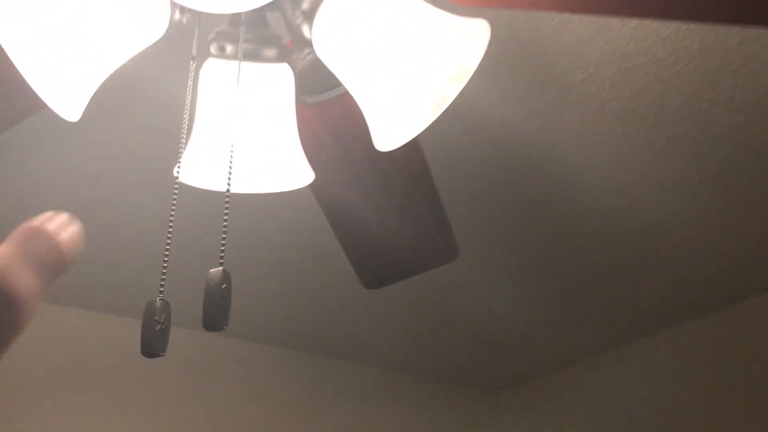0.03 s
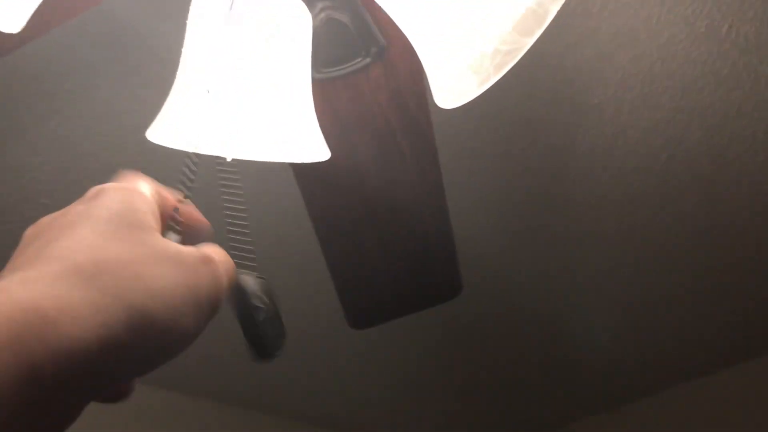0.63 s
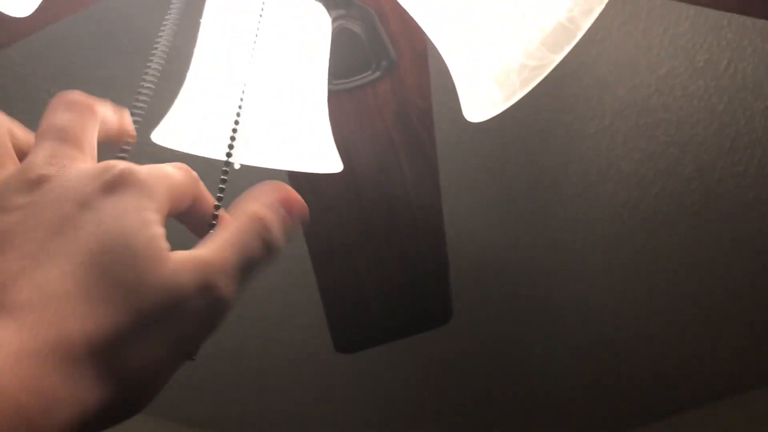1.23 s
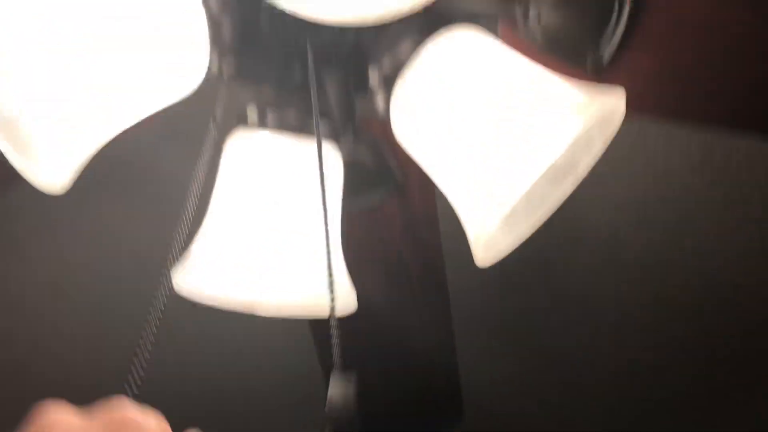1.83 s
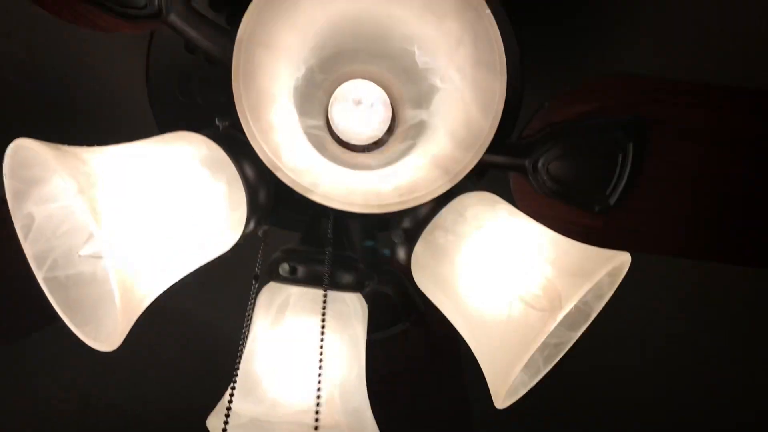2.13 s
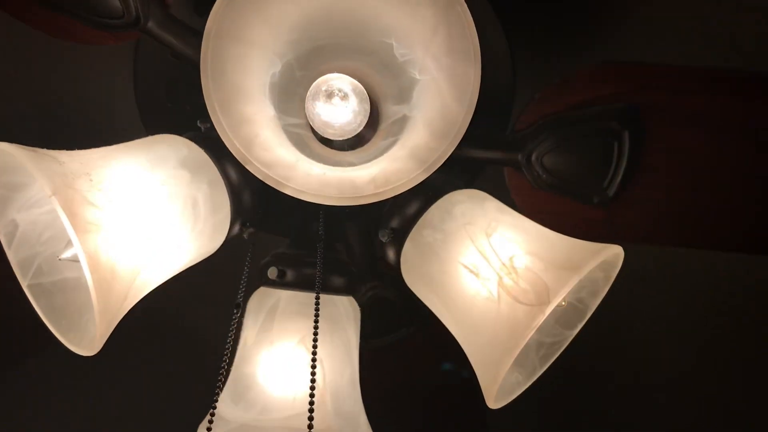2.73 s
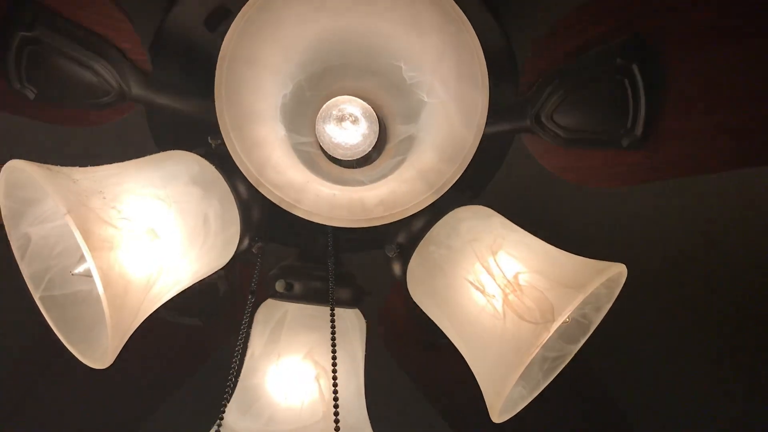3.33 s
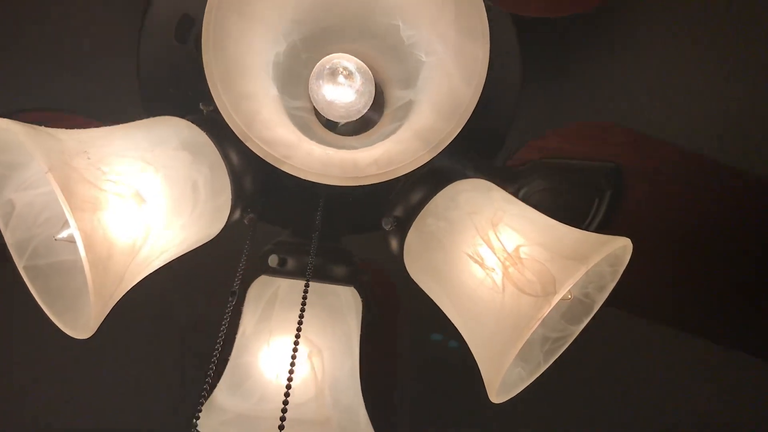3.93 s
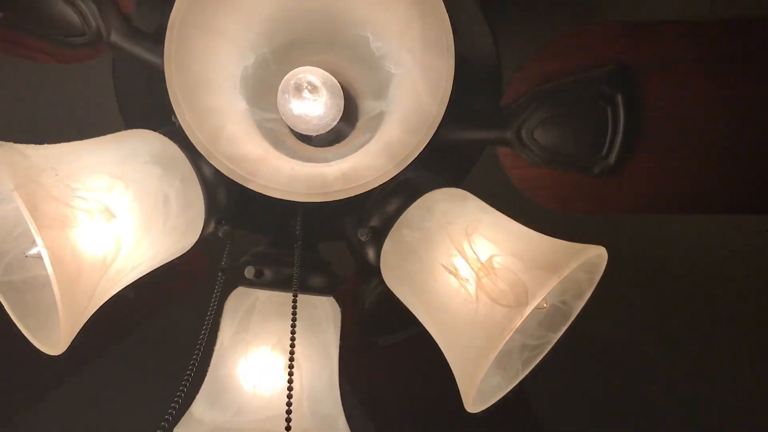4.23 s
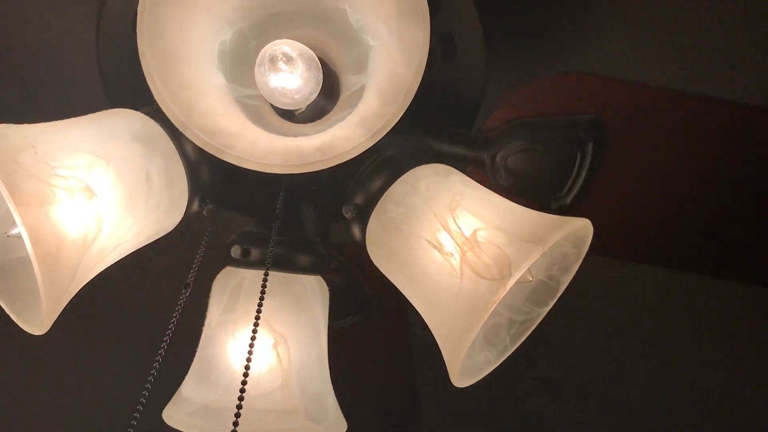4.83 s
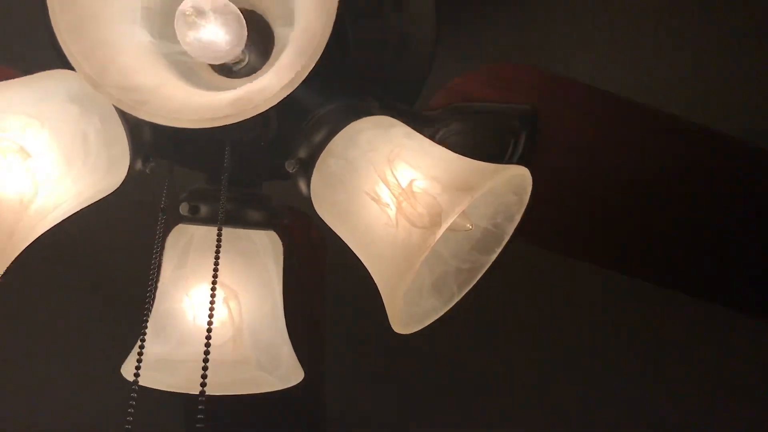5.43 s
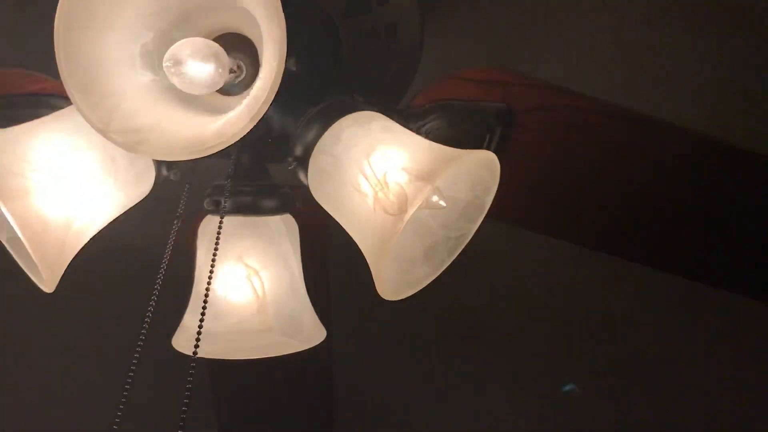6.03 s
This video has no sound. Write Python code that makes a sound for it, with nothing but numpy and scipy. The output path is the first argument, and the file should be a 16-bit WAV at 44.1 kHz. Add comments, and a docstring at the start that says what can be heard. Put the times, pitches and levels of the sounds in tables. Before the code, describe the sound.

In a small quiet room, the pendants of a ceiling fan's chains clack together and one chinks lightly on a glass shade. The chain is then pulled and released three times. Each time the beads scrape and tick, the switch snaps sharply with a dull shudder from the fan, and it clicks again on release. The microphone is close, with a very faint motor hum underneath.

```python
"""Ceiling fan pull chains

A small quiet room, one microphone close to the fan. Over a thin, fading hiss the chains' pendants knock
together and one chinks on a glass shade. The speed switch is pulled and let go three times: beads scrape
through the eyelet, the ratchet ticks and snaps, the housing rings and the tugged fan shudders on its
mount. From the first pull on, the motor hums faintly in the room tone."""
import sys
import numpy as np
from scipy import signal
from scipy.fft import rfft, irfft, next_fast_len
from scipy.io import wavfile
from scipy.ndimage import uniform_filter1d

SR = 44100
rng = np.random.default_rng(int(sys.argv[2]) if len(sys.argv) > 2 else 0)


def waveform_to_disk(signal):
    """Save audio, clipped to [-1, 1], as 16-bit WAV at the path in sys.argv[1]."""
    frames = np.transpose(np.atleast_2d(signal))
    scaled = np.clip(frames, -1, 1) * 32767
    samples = np.round(scaled).astype(np.int16)
    wavfile.write(sys.argv[1], SR, samples)


N = 267819
TIME = np.arange(N) / SR
RING_TIME = TIME[:int(SR * .7)]

# room tone spectrum: (frequency [Hz], gain [dB])
AIR_COLOUR = [(12, -42), (20, -15.5), (48, 3), (142, 1), (241, -5.5), (270, -2), (485, -9.5), (527, -8.5),
              (574, -9), (1480, -15), (1660, -17), (3340, -18.5), (10500, -26), (12800, -21),
              (16000, -29.5)]
# handling bump spectrum: (frequency [Hz], gain [dB])
BUMP_COLOUR = [(20, -16), (52, 4.5), (80, 0), (140, -11.5), (250, -29), (600, -67)]
# soft finger taps: (time [s], level [dB], band frequency [Hz])
FINGER_TAPS = [(.852, -57.5, 2570), (5.956, -49, 1000)]
# pendants knocking together: (time [s], relative level [dB])
KNOCKS = [(0.5479, 3), (.5573, -30.5), (0.5647, -4.5)]
# spectrum of a knock: (frequency [Hz], gain [dB])
KNOCK_COLOUR = [(240, -58), (400, -34.5), (777, -31), (1310, -24.5), (2320, -16.5), (4180, -5),
                (4800, -11.5), (5600, -0.5), (9470, -5), (13500, -47.5), (16000, -34)]
# beads jolted by the knocks: (time [s], level [dB])
BEAD_JOLTS = [(0.5471, -33), (0.5562, -33.5), (0.5607, -36.5)]
# pendant touching the shade: (time [s], ring level [dB], relative contact level [dB])
CHINKS = [(0.6657, -58, 17.5), (.734, -59.5, -7)]
# glass shade modes: (frequency [Hz], level [dB], t60 [s])
SHADE_MODES = [(3491, 0, 0.16), (5875, -0.5, 0.12), (7870, -15, 0.13), (9700, -17, 0.21), (11620, -9, 0.11),
               (12300, -10, 0.16), (13950, -13, 0.14)]
# spectrum of a bead or pendant contact: (frequency [Hz], gain [dB])
CONTACT_COLOUR = [(1000, -26.5), (4500, -5.5), (6500, 4), (8200, 6.5), (10300, -7), (12000, 4.5),
                  (14000, -6), (16000, -32)]
# edges of the body, bite, edge and top bands: (frequency [Hz])
BAND_EDGES = [250, 2800, 6200, 10500, 17000]
# the room's reverberation, a row per band: (gain [dB], t60 [s])
ROOM_DECAY = [(-2.5, 0.29), (-6.5, 0.25), (-10.5, 0.22), (-7, 0.16)]
# pawl and bead ticks: (time [s], level [dB], tilt [dB per band])
TICKS = [(2.231, -73.5, -10), (2.27, -66, -10), (2.291, -55, -1), (2.358, -58, -4), (2.372, -55, 2),
         (2.4698, -48, 0), (2.906, -52.5, 3), (2.944, -47, 2), (3.007, -53, 1), (3.49, -73, -13.5),
         (3.526, -50.5, 2.8), (3.584, -57.5, -2.5), (4.036, -49, 2), (4.0685, -46, 1.5),
         (4.523, -69.5, -8.5), (4.558, -50.5, 1), (4.623, -56, 3.5), (4.695, -51.5, -4),
         (4.977, -47.5, 1.5), (5.004, -44.5, 2), (5.023, -58, 7), (5.041, -56, 4), (5.142, -69.6, -6)]
# colour of all ticks, a value per band: (gain [dB])
TICK_COLOUR = [-2.5, 4, -0.5, -0.9]
# ratchet snaps, pull and release in turn:
# (time [s], body [dB], bite [dB], edge [dB], top [dB], base t60 [s], spring gain [dB], thud [dB])
SNAPS = [(2.5509, -37, -39, -36, -36.5, 0.0098, 2, -34.5),
         (2.9713, -36.5, -33.5, -31.5, -39, 0.017, 2.5, -44),
         (3.668, -39, -37, -40.5, -31.5, 0.047, -35, -32.5),
         (4.089, -32.5, -30, -30.5, -33.5, 0.0099, 6.5, -51),
         (4.7, -37.5, -36.5, -31.5, -33.5, 0.018, -14, -32),
         (5.0112, -39.5, -33.5, -26.5, -35, 0.016, 11.5, -59.5)]
# spectrum of the switch's crack: (frequency [Hz], gain [dB])
CRACK_COLOUR = [(200, -12.5), (450, -10), (640, -5), (850, -0.5), (2300, 0.5), (2750, -6.5), (3400, -3.5),
                (4600, -6), (6300, -0.5), (9600, 2), (10600, 1), (14000, 7.5), (16000, -7.5)]
# switch housing modes: (frequency [Hz], width [Hz], gain [dB])
HOUSING_MODES = [(535, 16, 11.5), (864, 19, -33), (1070, 32.6, 2.5), (1406, 110, 4), (1860, 230, 8.5),
                 (2400, 73, 2.5), (3480, 380, -2.5), (4255, 180, 4.5), (5300, 170, 9.5), (6540, 155, 5.5),
                 (7110, 150, 1), (8390, 480, 8.5), (12200, 160, -16), (15000, 460, -2.5)]
# return spring and seat, struck hardest on release: (frequency [Hz], width [Hz], gain [dB])
SPRING_MODES = [(890, 100, -7.5), (1960, 180, -10.5), (2380, 57, 6), (3670, 550, -1), (5220, 83, -2),
                (7220, 110, 7), (9240, 200, -9.5)]
# lamp holder modes: (frequency [Hz], level [dB], t60 [s])
LAMP_MODES = [(1050, -20.5, 0.42), (1458, -21, 0.19), (1601, -22, 0.61), (1645, -24.5, 0.83),
              (1750, -34, 0.33), (4170, -26, 0.55)]
# chain sliding through the eyelet: (start [s], length [s], relative level [dB])
SLIDES = [(2.26, 0.035, -55.5), (2.351, 0.025, -47.5), (2.364, 0.097, -65), (2.456, 0.021, -42.5),
          (2.832, 0.078, -67), (2.895, 0.031, -53.5), (3.503, 0.025, -51.5), (3.56, 0.038, -51),
          (3.658, 0.0105, -41), (4.02, 0.07, -55), (4.505, 0.15, -57), (4.684, 0.037, -45),
          (4.919, 0.18, -60)]
# load on the fan, a row per snap: (build-up [s], relative strain [dB], relative jolt [dB])
TUGS = [(0.29, -44, -47), (0.11, -59, -55.5), (0.2, -51, -41), (0.066, -53, -57.5), (0.19, -51.5, -42.5),
        (0.058, -63, -58)]
# ceiling mount modes: (frequency [Hz], width [Hz], gain [dB])
MOUNT_MODES = [(55.6, 9.1, -8), (77, 8.2, 4)]
# blade modes: (frequency [Hz], width [Hz], gain [dB])
BLADE_MODES = [(129.3, 6.5, 3), (135, 10.5, -3), (173, 46, -12.5), (192.4, 6.8, -5.5)]
# mains harmonics in the hum, a row per speed: (second [dB], fourth [dB], sixth [dB])
SPEED_HUMS = [(-70, -82.5, -77), (-71.5, -74, -81.5), (-81, -78.5, -92.5)]


def undb(db):
    """Decibels to gain."""
    return 10 ** (np.asarray(db) / 20)


def unit(x):
    """Scale to an rms of one."""
    return x / np.sqrt(np.mean(x ** 2))


def noise():
    """White noise as long as the scene."""
    return rng.standard_normal(N)


def add(track, s, x):
    """Mix x into the track at s seconds."""
    i = int(s * SR)
    track[i:i + len(x)] += x[:N - i]


def fade(t60, t=RING_TIME):
    """Full level until t is zero, then a decay of 60 dB per t60."""
    return np.exp(-np.log(1000) * np.maximum(t, 0) / t60)


def swell(s, rise, hold, t60):
    """Envelope that starts at s seconds, rises, holds and decays."""
    t = TIME - s
    return np.clip(t / max(rise, 1e-3), 0, 1) * fade(t60, t - rise - hold)


def band(x, lo_hz, hi_hz):
    """Band-pass filter."""
    return signal.sosfilt(signal.butter(4, [lo_hz, hi_hz], "band", fs=SR, output="sos"), x)


def tint(x, points):
    """Causal filter whose gain follows (frequency [Hz], gain [dB]) points."""
    size = 2 * next_fast_len(len(x))
    hz, db = np.transpose(points)
    freq = np.maximum(np.fft.rfftfreq(size, 1 / SR), 1)
    gain = undb(np.interp(np.log(freq), np.log(hz), db))
    cepstrum = irfft(np.log(gain))
    cepstrum[1:size // 2] *= 2  # fold to minimum phase
    cepstrum[size // 2 + 1:] = 0
    return irfft(rfft(x, size) * np.exp(rfft(cepstrum)))[:len(x)]


def resonate(x, modes):
    """Pass x through (frequency [Hz], width [Hz], gain [dB]) resonances."""
    size = next_fast_len(len(x))
    freq = np.fft.rfftfreq(size, 1 / SR)
    response = sum(undb(db) / (1 + 2j * (freq - hz) / width) for hz, width, db in modes)
    return irfft(rfft(x, size) * response, size)[:len(x)]


def room_tone(level_db=-67):
    """The still air of the room, mostly low rumble."""
    return undb(level_db) * unit(tint(noise(), AIR_COLOUR))


def grains(per_second):
    """Tiny clicks of uneven size at random moments."""
    return unit(noise() * (rng.random(N) < per_second / SR))


def hiss_and_rustle():
    """A thin, high hiss holds, then slowly fades; loose chains rattle on pulls and swing on releases."""
    hiss = undb(-78) * swell(0, rise=0, hold=1.33, t60=8.9)
    rattle = undb(-71) * np.hanning(int(0.18 * SR))
    swing = undb(-79) * np.hanning(int(0.42 * SR))
    chains = np.zeros(N)
    for s, *_ in SNAPS[::2]:
        add(chains, s + 0.033, rattle)
    for s, *_ in SNAPS[1::2]:
        add(chains, s + 0.2, swing)
    colour = [(2000, -21.5), (5000, -2.5), (8500, -1), (10500, -6), (12700, 5.5), (16000, -8)]
    return (hiss + chains) * unit(tint(grains(per_second=3300), colour))


def handling():
    """A soft bump at the microphone as the arm reaches up, and dull finger taps."""
    bump = swell(0.25, rise=0.023, hold=0.015, t60=0.8)
    out = undb(-51) * bump * unit(tint(noise(), BUMP_COLOUR))
    for s, db, hz in FINGER_TAPS:
        add(out, s, undb(db) * band(chatter(t60=0.068, hold=0.0028), hz / 2, hz * 1.35))
    return out


def chatter(t60, hold, rise=0.00021):
    """Small hard parts chatter in contact for a moment, then their vibration dies quickly."""
    t = RING_TIME[:6000]
    attack = 1 - np.exp(-t / rise)
    return rng.standard_normal(len(t)) * attack * fade(t60, t - hold)


def ring(modes):
    """Freely decaying modes; each blow weights them a little differently."""
    out = 0
    for hz, db, t60 in modes:
        gain = undb(db + rng.standard_normal())
        out = out + gain * fade(t60) * np.sin(2 * np.pi * (hz * RING_TIME + rng.random()))
    return out


def pendants():
    """Two light pendants clack and jolt their beads; one then chinks on a glass shade."""
    knocks, chinks = np.zeros(N), np.zeros(N)
    for s, db in KNOCKS:
        add(knocks, s, undb([db]))
    for s, db in BEAD_JOLTS:
        beads = tint(chatter(t60=0.0085, hold=0.0019), CONTACT_COLOUR)
        add(chinks, s, undb(db) * band(beads, lo_hz=1800, hi_hz=10500))
    for s, db, contact_db in CHINKS:
        add(chinks, s, undb(db) * ring(SHADE_MODES))
        contact = tint(chatter(t60=0.011, hold=0.0014), CONTACT_COLOUR)
        add(chinks, s, undb(db + contact_db + 6.5) * contact)
    return undb(4) * tint(knocks, KNOCK_COLOUR) + chinks


def reflections(ceiling_delay_s=0.0047):
    """A diffuse room response that sets in around the bounce off the ceiling."""
    onset = np.clip(RING_TIME / ceiling_delay_s - .5, 0, 1)
    tail = 0
    for (db, t60), lo, hi in zip(ROOM_DECAY, BAND_EDGES, BAND_EDGES[1:]):
        envelope = onset * fade(t60)
        scatter = band(rng.standard_normal(len(RING_TIME)), lo, hi)
        tail = tail + undb(db) * scatter * envelope / np.linalg.norm(envelope)
    return tail


def room_echo(x, stretches=14):
    """The blades turn and the microphone drifts, so each stretch of time has its own reflections."""
    out, start = np.zeros(N), 0
    for stretch in np.array_split(x, stretches):
        add(out, start / SR, signal.fftconvolve(stretch, reflections()))
        start += len(stretch)
    return out


def blow(levels, t60, hold, rise, housing_db, spring_db, damping):
    """One impact in the switch: a crack coloured by housing and spring; lower bands die more slowly."""
    onset = int(.006 * SR)  # the first 6 ms set each band's level
    out = 0
    for db, lo, hi in zip(levels, BAND_EDGES, BAND_EDGES[1:]):
        band_t60 = t60 * (9000 / hi) ** damping
        crack = tint(chatter(band_t60, hold, rise), CRACK_COLOUR)
        housing = undb(housing_db) * resonate(crack, HOUSING_MODES)
        spring = undb(spring_db) * resonate(crack, SPRING_MODES)
        part = band(crack + housing + spring, lo, hi)
        out = out + undb(db) * part / np.sqrt(np.mean(part[:onset] ** 2))
    return out


def switch():
    """The pawl ticks over the ratchet and snaps into the next position; a pull thuds on the end stop."""
    out = np.zeros(N)
    for s, *levels, t60, spring_db, thud_db in SNAPS:
        snap = blow(levels, t60, hold=.0033, rise=.0008,
                    housing_db=-6.5, spring_db=spring_db, damping=.36)
        thud = band(chatter(t60=0.08, hold=0.0022), lo_hz=287, hi_hz=560)
        add(out, s, snap + undb(thud_db) * thud)
    bands = np.arange(len(TICK_COLOUR))
    for s, db, tilt_db in TICKS:
        levels = db + np.array(TICK_COLOUR) + tilt_db * (bands - bands.mean())
        tick = blow(levels, t60=.02, hold=.0015, rise=.0003, housing_db=-2.5, spring_db=-14, damping=.26)
        add(out, s, tick)
    return out


def lamp_holders():
    """The body of every blow in the switch sets the lamp holders ringing."""
    out = np.zeros(N)
    for s, body_db, *_ in SNAPS:
        add(out, s, undb(body_db) * ring(LAMP_MODES))
    for s, db, _ in TICKS:
        add(out, s, undb(db + 2) * ring(LAMP_MODES))
    return out


def eyelet_scrape():
    """Beads rub over the eyelet in tiny slips as the pull builds, and the housing resonates."""
    pressure = np.zeros(N)
    for s, length, db in SLIDES:
        progress = np.linspace(0, 1, int(length * SR))
        add(pressure, s, undb(db) * progress ** 0.42 * signal.windows.tukey(len(progress), .3))
    colour = [(400, -11.5), (900, -7.5), (1400, 1), (2400, -4), (5500, -3.5), (9000, -13), (16000, -13)]
    rub = tint(pressure * grains(per_second=4500), colour)
    return undb(4.5) * rub + undb(2) * resonate(rub, HOUSING_MODES)


def sway(modes, lo_hz, hi_hz):
    """Irregular motion of low modes at an even strength."""
    motion = band(resonate(noise(), modes), lo_hz, hi_hz)
    return motion / np.sqrt(uniform_filter1d(motion ** 2, size=1600))


def shudder():
    """Each tug's growing strain mostly shakes the blades; the snap's jolt mostly rocks the mount."""
    strain, jolt = 0, 0
    for (s, *_), (build, strain_db, jolt_db) in zip(SNAPS, TUGS):
        strain = strain + undb(strain_db) * swell(s - build, rise=build, hold=0, t60=0.1) ** 1.02
        jolt = jolt + undb(jolt_db) * swell(s, rise=0.015, hold=0.04, t60=0.44)
    mount = (undb(-4.5) * strain + undb(-.5) * jolt) * sway(MOUNT_MODES, lo_hz=40, hi_hz=102.9)
    blades = (strain + undb(-4) * jolt) * sway(BLADE_MODES, lo_hz=98, hi_hz=204)
    rumble = (undb(-17) * strain + undb(-22) * jolt) * unit(band(noise(), lo_hz=24, hi_hz=42))
    creak = undb(-26) * strain * unit(band(noise(), lo_hz=270, hi_hz=483))
    return mount + blades + rumble + creak


def motor_hum(mains_hz=60, change_s=0.08):
    """Magnetic hum that starts with the first pull; each speed has its own balance of harmonics."""
    engaged = [np.clip((TIME - s) / change_s, 0, 1) for s, *_ in SNAPS[::2]] + [0]
    out = 0
    for harmonic, levels in zip((2, 4, 6), np.transpose(SPEED_HUMS)):
        rms = sum(undb(db) * (on - off) for db, on, off in zip(levels, engaged, engaged[1:]))
        out = out + rms * np.sqrt(2) * np.sin(2 * np.pi * (harmonic * mains_hz * TIME + rng.random()))
    return out


def scene():
    """Close by, in mono: switch, chains and pendants with their echo, over shudder, hum and room tone."""
    works = switch() + eyelet_scrape() + hiss_and_rustle()
    lamps = lamp_holders()
    clacks = pendants()
    echo = room_echo(works + lamps / 3 + undb(-1.5) * clacks)
    return (works + lamps + clacks + echo + room_tone() + shudder() + handling() + motor_hum())[None]


def record(dry):
    """The microphone is a phone's, which cuts the top of the treble."""
    top_hz = 16200
    return signal.sosfilt(signal.ellip(8, .2, 60, top_hz, fs=SR, output="sos"), dry)


dry = scene()
out = record(dry)
waveform_to_disk(out)
```